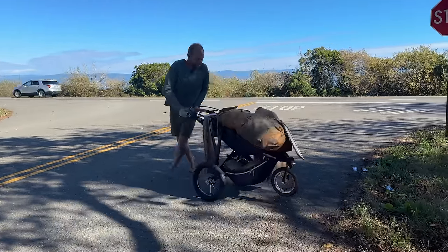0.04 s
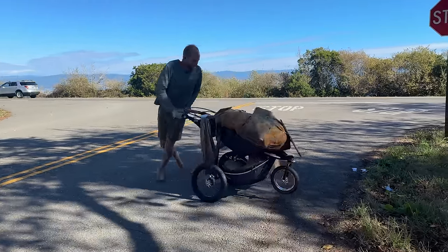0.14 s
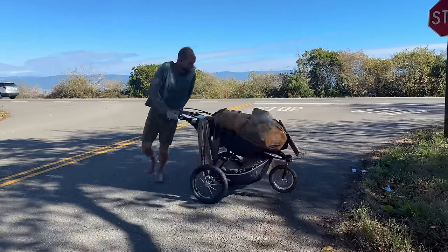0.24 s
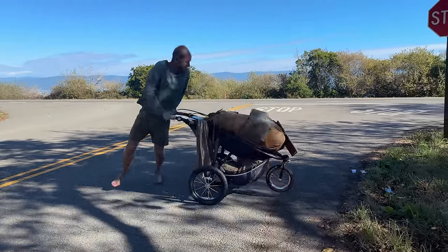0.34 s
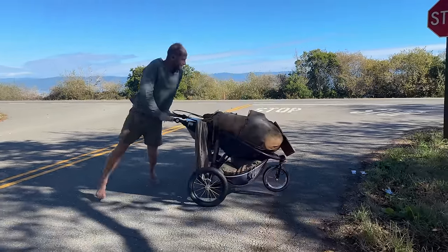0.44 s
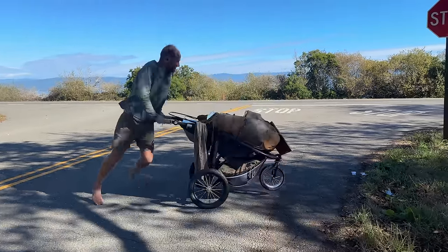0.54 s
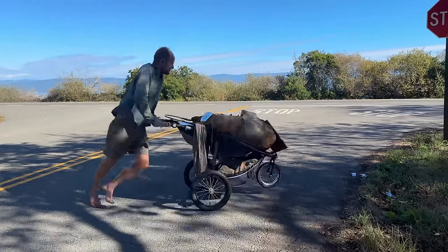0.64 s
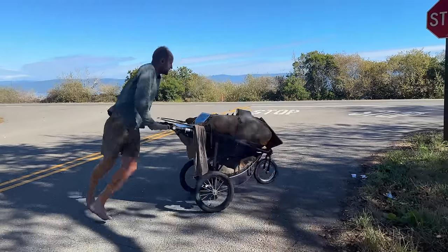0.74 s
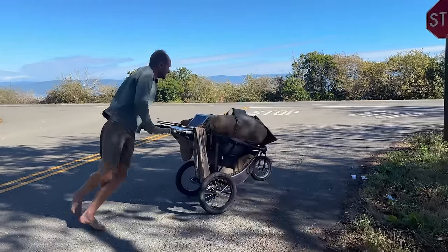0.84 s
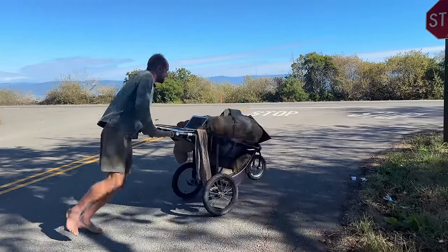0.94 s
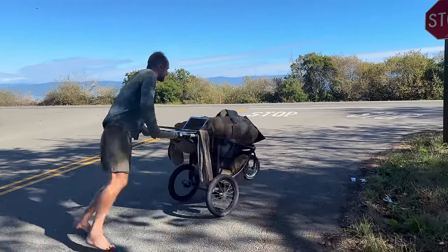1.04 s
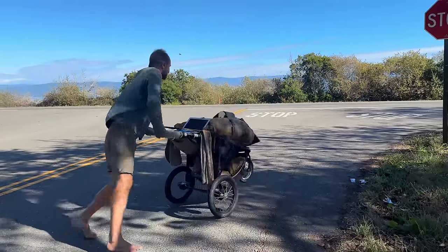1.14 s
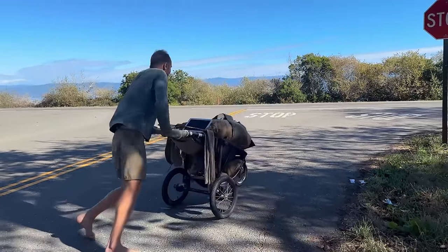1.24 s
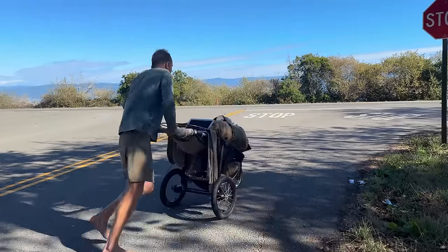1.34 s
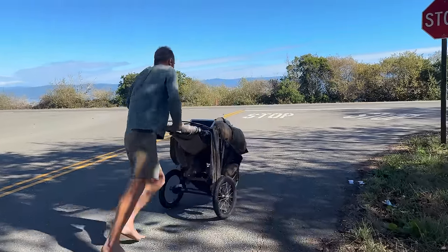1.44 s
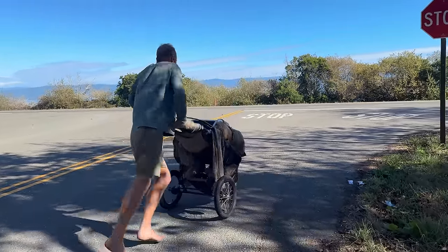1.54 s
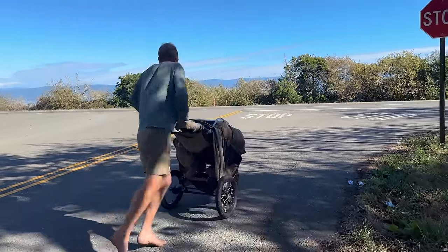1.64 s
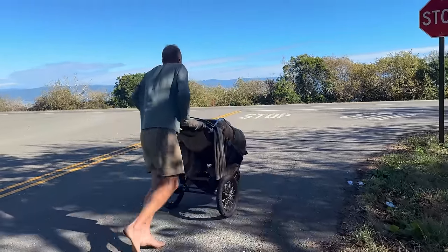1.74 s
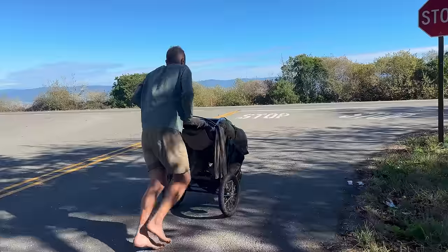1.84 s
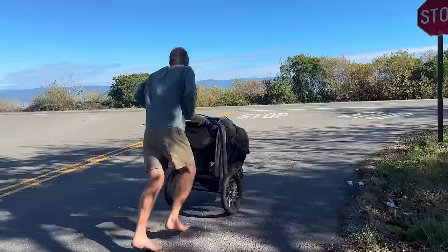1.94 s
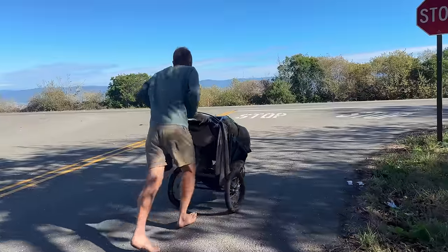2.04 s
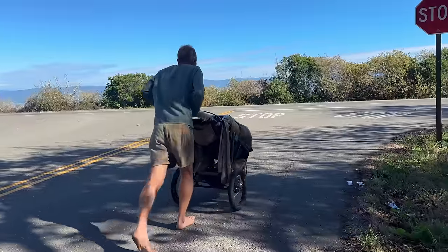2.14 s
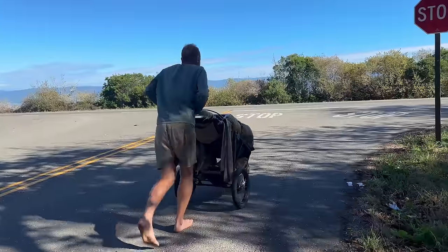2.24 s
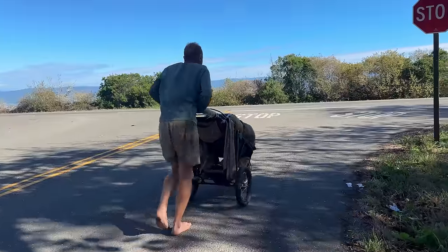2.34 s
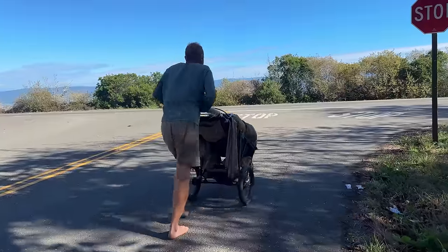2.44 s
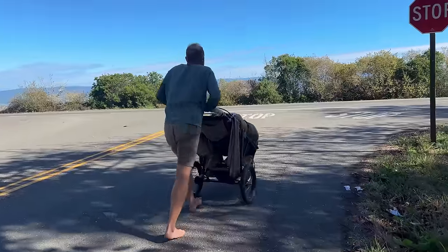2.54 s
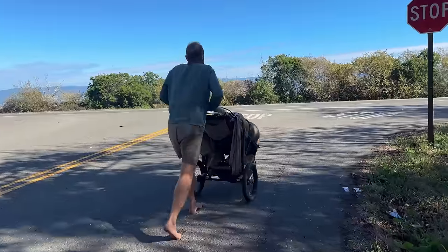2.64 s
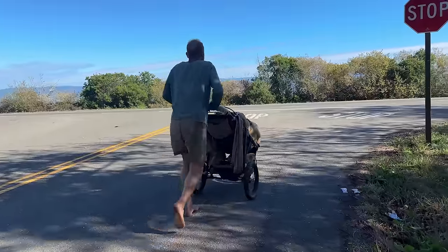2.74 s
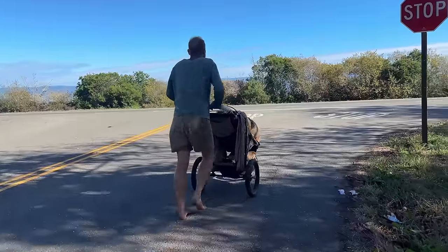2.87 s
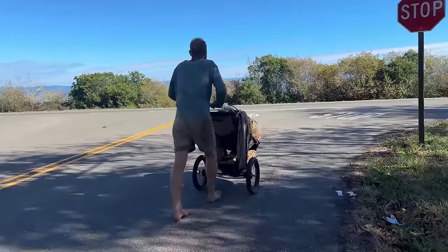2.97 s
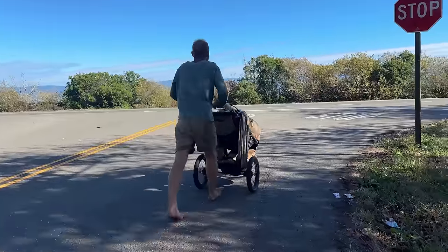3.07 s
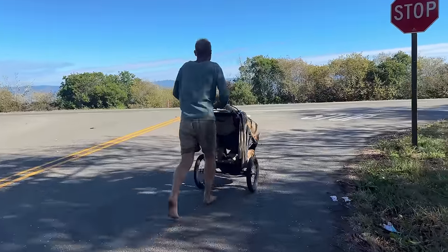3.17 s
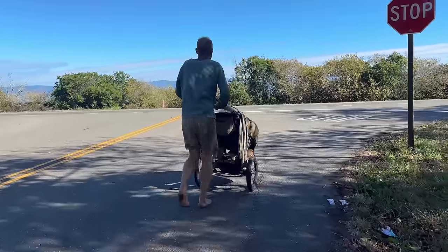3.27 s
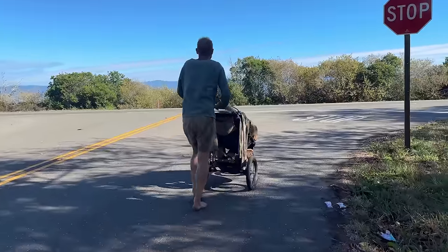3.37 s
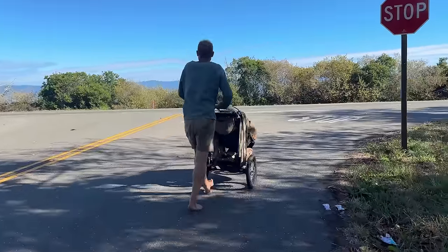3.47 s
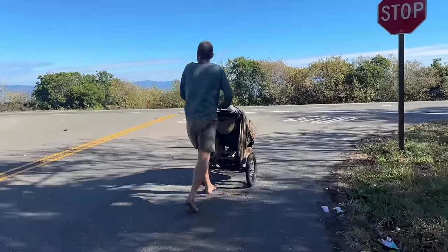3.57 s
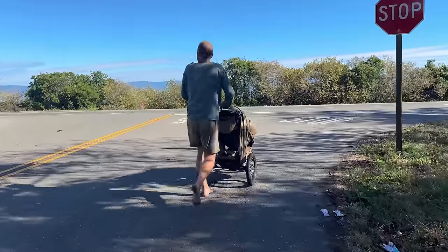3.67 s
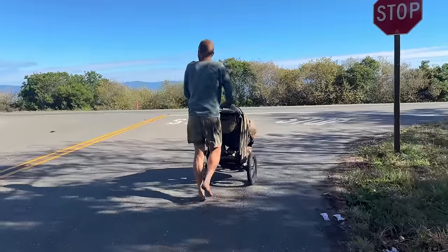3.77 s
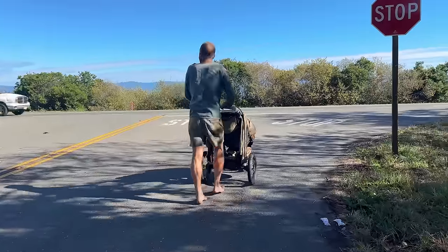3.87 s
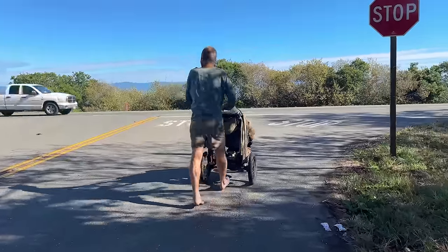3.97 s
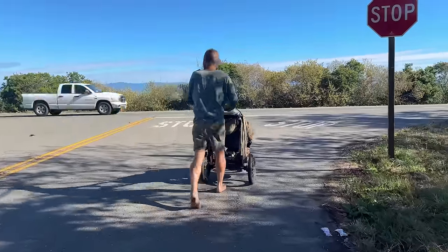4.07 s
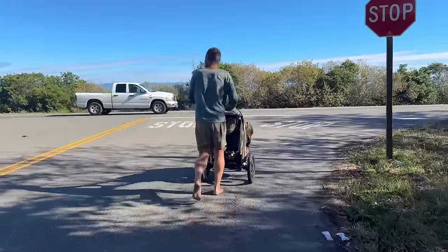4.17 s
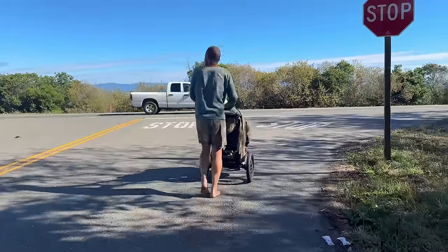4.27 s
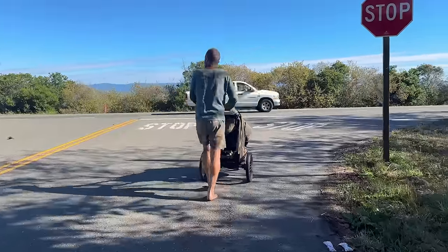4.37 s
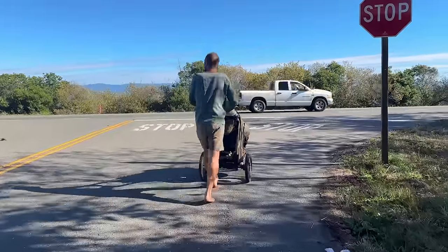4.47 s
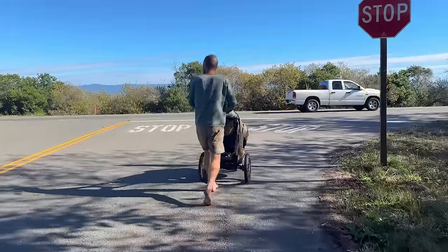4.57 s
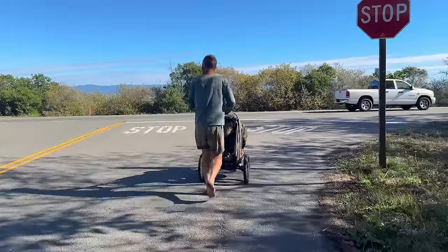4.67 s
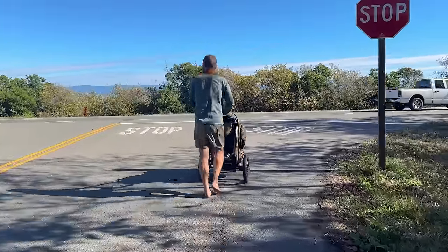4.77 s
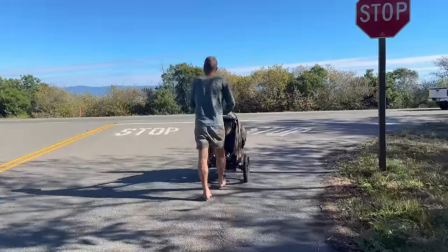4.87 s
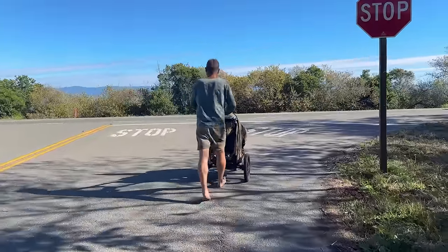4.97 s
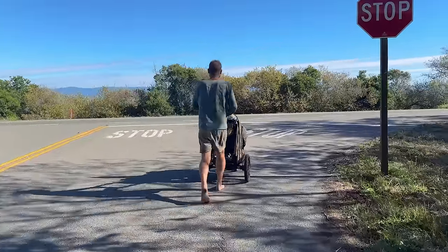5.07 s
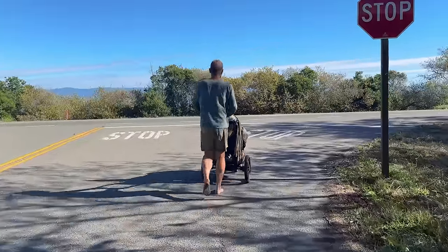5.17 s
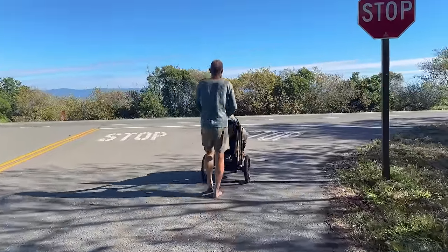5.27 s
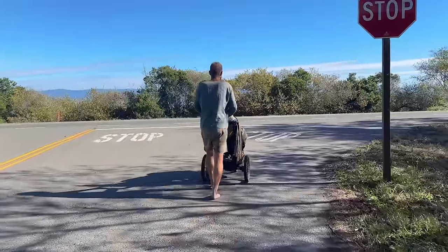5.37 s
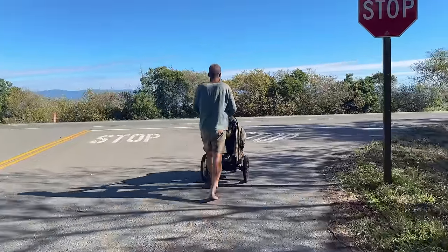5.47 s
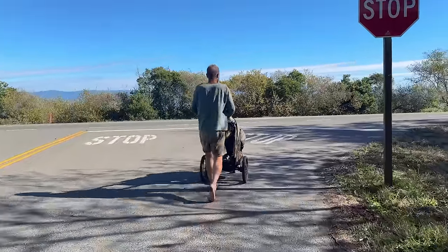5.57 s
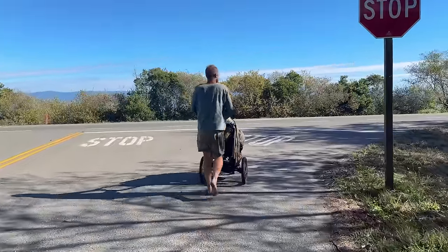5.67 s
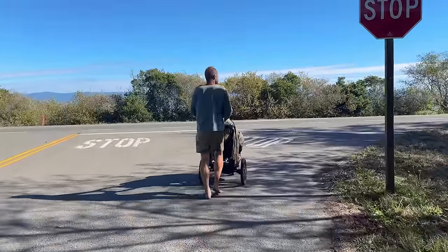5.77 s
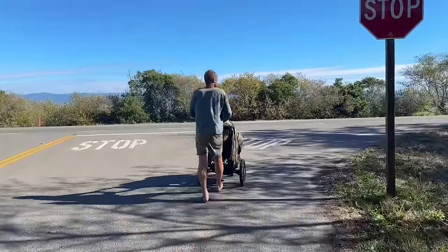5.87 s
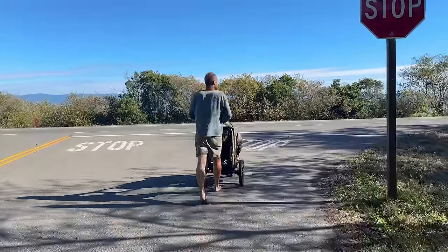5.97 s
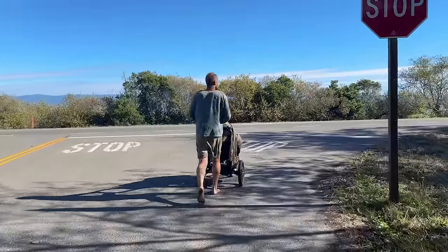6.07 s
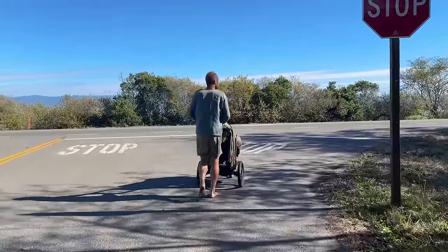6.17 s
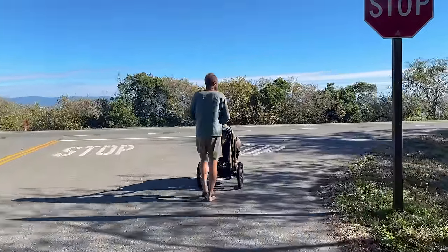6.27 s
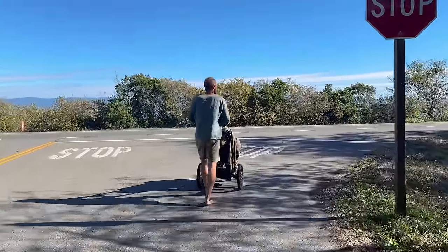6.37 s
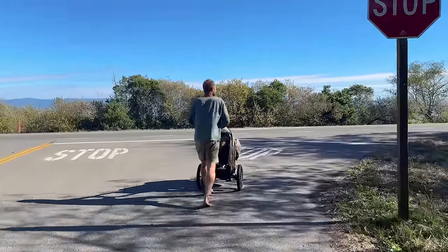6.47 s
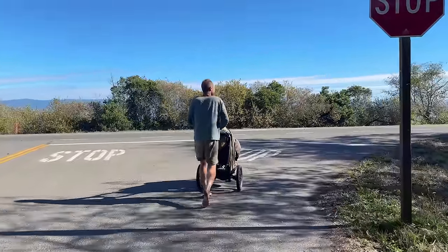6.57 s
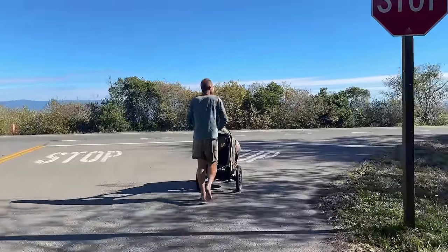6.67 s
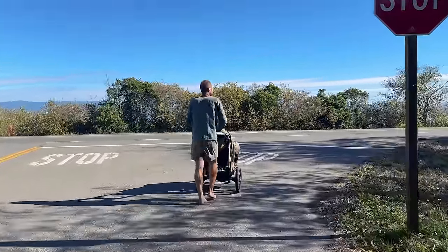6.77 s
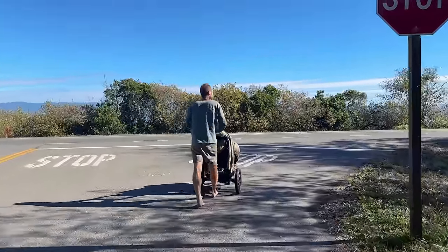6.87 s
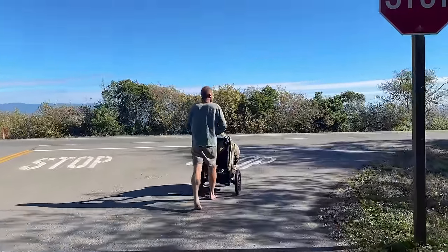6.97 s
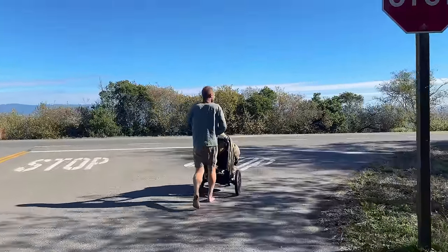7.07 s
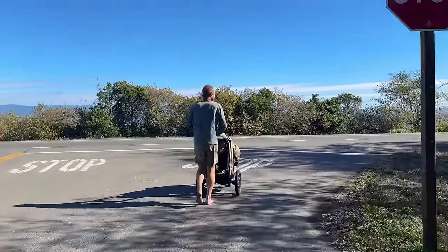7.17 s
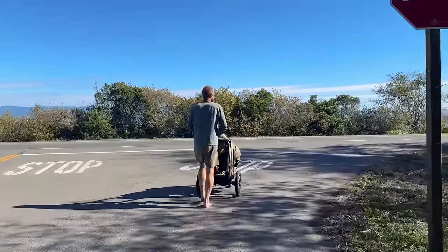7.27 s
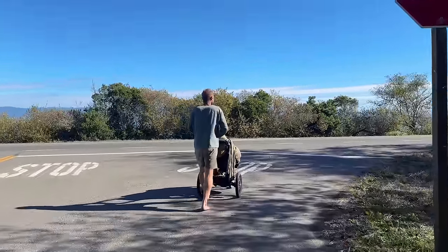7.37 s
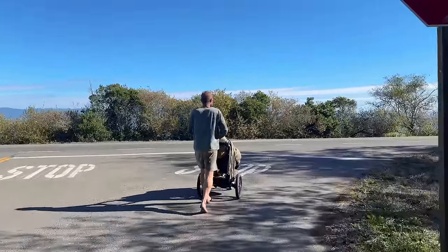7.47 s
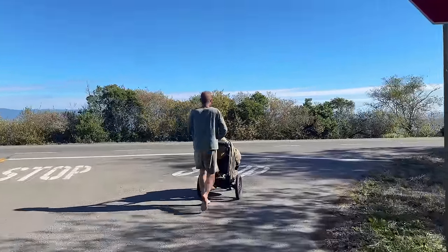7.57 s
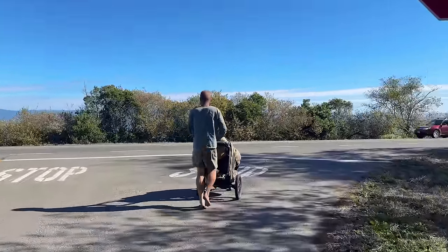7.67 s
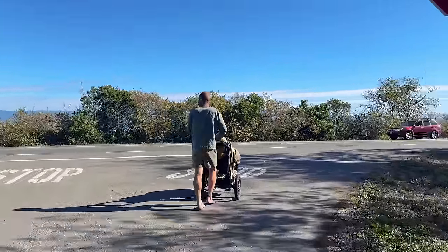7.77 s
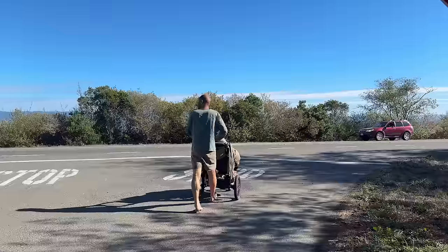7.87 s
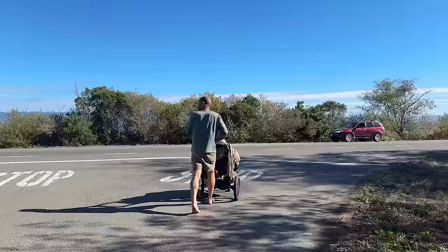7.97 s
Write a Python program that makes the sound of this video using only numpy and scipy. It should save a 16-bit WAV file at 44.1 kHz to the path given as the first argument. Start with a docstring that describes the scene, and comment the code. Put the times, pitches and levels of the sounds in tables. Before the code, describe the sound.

On a quiet side road, a car fades away to the left along a highway while cart wheels crunch grit and scuff the asphalt close to the stereo microphone. A pebble snaps. A pickup then sweeps from left to right with a low exhaust rumble and rushing, hissing tyres. As it recedes, a faint high insect buzz rises and another car approaches from the right. Small puffs of air thud on the microphone.

```python
"""A pickup sweeps left to right along a highway, 17 m from a stereo microphone on a quiet side road.
Its exhaust rumbles, its tread drums, road texture adds a rush and air squeezed from the tyres hisses.
Before it a car recedes to the left; after it another approaches from the right, past roadside bushes.
Close to the microphone a barefoot runner pushes a three-wheeled cart, crushing grit and snapping pebbles.
An insect buzzes in the verge, and puffs of air thud on the microphone."""
import sys
import numpy as np
from scipy import signal
from scipy.fft import rfft, irfft, next_fast_len
from scipy.io import wavfile
from scipy.ndimage import map_coordinates

SR = 44100
rng = np.random.default_rng(int(sys.argv[2]) if len(sys.argv) > 2 else 0)


def persist_wave(psi):
    """Save psi, clipped to +-1, as 16-bit WAV."""
    counts = np.round(np.clip(psi, -1, 1) * 32767).astype(np.int16)
    wavfile.write(sys.argv[1], SR, np.atleast_2d(counts).T)


N = 353682
TIME = np.arange(N) / SR

# Car, pickup, car: closest_s, rightward_m_per_s, distance_m, then relative to the pickup
# boom_db, drone_db, body_db, tread_db, hum_db, rush_db, hiss_db, and last tread_hz, groove_hz
VEHICLES = [(-0.39, -21, 12, -20.5, -18.3, -13.5, -17, -16, -18, -28, 930, 1300),
            (4.28, 30, 17, 0, 0, 0, 0, 0, 0, 0, 795, 1270),
            (8.85, -19, 25, -3, 1.8, -1.5, 2.7, -2, -6, -4, 810, 1230)]
# How each layer carries to the microphone: side_on_db (at REFERENCE_M), loss_db_per_m, beam_ahead_db,
# beam_behind_db, beam_narrowness, bush_shade_share, hedge_loss_db, far_traffic_db
CARRY = {"boom": (-30.3, 0.15, 5.5, 4.5, 2, 0.3, 0, -50), "drone": (-23.7, 0.48, 5, 4, 2, 0.05, 0, -44.3),
         "body": (-25.7, 0.17, -0.3, -1.3, 1.6, 0.45, 2.5, -50),
         "tread": (-25.2, 0.41, 8.6, 7, 1.9, 1.2, 0, -47.5), "hum": (-36, 0.28, 13, 7, 3, 1.2, 0, -55),
         "rush": (-26.8, 0.35, 8.6, 3.5, 1.5, 0.8, 0, -53.5),
         "hiss": (-38.7, 0.45, 10.5, 4.3, 1, 0.02, 11, -73),
         "sizzle": (-45.5, 0.7, 8.5, 4, 1.3, 0.02, 10, -90)}
# Scattered against straight sound, by tyre layer: level_db
SCATTER_DB = {"body": -19, "tread": -15, "rush": -12, "hiss": -7}
# The pickup's firing orders at the closest point: multiple of ENGINE_HZ, level_db
ENGINE_ORDERS = [(2, -32.5), (3, -35), (5, -36)]
# Noise colours of exhausts, tyres and grit: frequency_hz, relative_db
EXHAUST_RUMBLE = [(20, -51), (35, -17), (55, -1), (75, 0.5), (95, -1.5), (130, -17.5), (220, -46)]
EXHAUST_DRONE = [(70, -23), (115, 2.5), (150, 2.5), (200, -1), (290, -3.5), (400, -15.5), (700, -34)]
TYRE_BODY = [(200, -16), (330, -2), (480, 0), (620, -1), (800, -3), (1200, -32)]
TYRE_RUSH = [(600, -22), (900, 2), (1200, -1), (1550, -6.5), (1950, -5.5), (2500, -10.5), (3400, -22),
             (6000, -41)]
TYRE_HISS = [(1300, -11), (2100, 0.5), (2900, 5), (4200, 3.2), (6000, -0.6), (8500, -9), (11000, -13.5),
             (15000, -19)]
TYRE_SIZZLE = [(3500, -24), (6000, -2), (8500, -9), (11000, -8), (15000, -3)]
GRIT_COLOUR = [(900, 16), (2500, 8), (5000, 8.5), (8000, 1), (11000, -1), (15000, 3)]
# Bands of the pickup's whoosh at its height: centre_hz, width_hz, level_db
WHOOSH_BANDS = [(600, 75, -23.5), (385, 65, -30)]
# Bushes along the highway: rightward_m, half_width_m, shade_db
BUSHES = [(-26.3, 2.9, 11.5), (23.4, 2.0, 4), (48.5, 4.2, 8.5)]
# Roadside reflections: delay_ms (source straight ahead), slide_ms per ms of port lead, level_db
REFLECTIONS = [(2.2, 3, -19), (4.1, -4.5, -16.5), (7.3, 8, -14.5)]
# The band cancelled by the road's reflection, lower for a farther vehicle: time_s, centre_hz, depth_db
GROUND_DIP = [(0, 540, 3), (0.7, 510, 2), (2, 500, 2), (3.3, 480, 2), (4.2, 400, 1), (4.7, 450, 4.5),
              (5.15, 330, 4), (5.7, 215, 4.5), (6.3, 190, 4.5), (7, 245, 4.5), (7.4, 365, 4.5), (8, 480, 8)]
# Lag of the microphone's left side: frequency_hz, lag_rad
PORT_LAG = [(120, 0.02), (280, 0.25), (500, 0.62), (800, 0.55), (1250, 0.85), (2000, -0.15), (3500, -0.1),
            (7000, -0.1)]
# Its left side over its right: frequency_hz, far_right_db, half_right_db, half_left_db, far_left_db
PORT_BALANCE = [(120, .2, .2, .3, .3), (350, 1.2, 1, 1, .8), (500, 0, -2.5, .3, 1.2),
                (720, -3.5, -4, -.8, 3.5), (1020, -.5, -6, 0, 3), (1350, -3, -5, -2.3, -1.8),
                (1750, -3.5, -5.3, -5, -3), (2100, -.5, -3.8, -3, -3), (2800, -3.5, -3.3, -2.5, -3.3),
                (4000, -2.5, -2, -3, -3.2), (5000, 0, -2.2, -1, -3), (8000, -1.5, -.5, -4, -4)]
# Those four directions: share of the greatest port lead
PORT_DIRECTIONS = [-.75, -.35, .6, .92]
# The loudest grit crushed under the cart's wheels: start_s, relative_db
CRUNCHES = [(0.1214, -36), (0.143, -40), (0.209, -45), (0.2808, -47), (0.435, -42), (0.4768, -45),
            (0.497, -47), (0.5092, -42), (0.5275, -43), (0.6739, -45), (0.7383, -41), (0.759, -44),
            (0.7642, -43), (0.7776, -44), (0.857, -46), (0.9713, -43), (0.987, -46), (1.0183, -43),
            (1.3009, -43), (1.3279, -45), (1.3788, -36.5), (1.4526, -39), (1.507, -35.5), (1.5832, -35),
            (1.8731, -47), (1.8831, -46), (1.9275, -44), (1.939, -42), (1.9639, -45), (2.1056, -42),
            (2.128, -39), (2.1425, -40), (2.1685, -41), (2.186, -37), (2.2039, -41), (2.2304, -37),
            (2.2463, -34.5), (2.263, -42), (2.2952, -44), (2.3311, -40), (2.3478, -36.5), (2.3888, -42),
            (2.4713, -28), (2.4955, -40), (2.5511, -45), (2.665, -34.5), (2.7367, -45), (2.7656, -38.5),
            (6.163, -48), (6.3182, -47), (6.853, -42), (6.8804, -42), (6.9325, -36)]
# Soles and tyres scuffing the asphalt: centre_s, half_length_s, relative_db
SCUFFS = [(0.49, 0.06, -62), (0.756, 0.054, -64), (1.3, 0.3, -68), (1.747, 0.028, -61.5),
          (1.914, 0.056, -67), (2.277, .14, -61.5), (2.59, 0.083, -56.5)]
# Pebbles snapping free: start_s, snap_db, ring_pitch_hz, ring_db
PEBBLE_SNAPS = [(0.4292, -41, 5400, -43), (2.4725, -41, 2700, -31), (3.0571, -21, 4700, -26),
                (6.7645, -35.5, 5500, -30)]
# A pebble's modes: pitch_hz, relative_db, t60_s
PEBBLE_MODES = [(950, -8, .0025), (1500, 13, 0.0022), (2350, 10.5, 0.0022), (4670, 7, 0.004),
                (5550, 12, 0.0026), (8060, 11, 0.002), (13500, 11, .001)]
# Puffs of air on the microphone: centre_s, level_db
PUFFS = [(2.11, -33.5), (4.0, -22.5), (6.08, -37), (6.26, -35), (6.41, -30.5), (6.548, -34), (6.94, -35),
         (7.14, -31)]

SOUND_M_PER_S, REFERENCE_M = 343, 17
ENGINE_HZ = 44.82  # the pickup's turning rate
PORT_MS = 0.36  # time for sound to cross the microphone's ports; a positive lead is from the left
# The microphone swings to the right with the runner; 0 faces straight across the highway.
MIC_FIRST_RAD, MIC_FINAL_RAD, MIC_SWING_S = -0.05, 0.37, 2.4
HEDGE_END_M, HEDGE_EDGE_M = -32.5, 1.5  # a hedge hides the treble left of here
# Side-on, the horn between tyre and road points away; the surge comes as its rear opens to the microphone.
SIDE_ON_RAD, SIDE_ON_WIDTH_RAD, SIDE_ON_PITCH_SAG = 0.26, 0.19, 0.19
SIDE_ON_TREBLE_LOSS_DB, SIDE_ON_TREAD_LOSS_DB = 3.8, 2.5
SURGE_RAD, SURGE_WIDTH_RAD, SURGE_DB = 0.57, 0.09, 2.8


def passing(closest_s, speed, distance):
    """A vehicle on a straight lane: metres along it, metres from the microphone, bearing, Doppler ratio."""
    along = speed * (TIME - closest_s)
    metres = np.hypot(along, distance)
    doppler = 1 / (1 + speed * along / metres / SOUND_M_PER_S)
    return along, metres, np.arctan2(along, distance), doppler


def highway():
    """Traffic spreads, is absorbed, beams along the lane and dips behind bushes and hedge.
    Returns each layer's level, and port lead and tyre pitches weighted toward the loudest vehicle."""
    power = {layer: from_db(row[-1]) ** 2 for layer, row in CARRY.items()}
    weights, traits = [], []
    facing = np.interp(TIME, [0, MIC_SWING_S], [MIC_FIRST_RAD, MIC_FINAL_RAD])
    for closest_s, speed, distance, *levels_db, tread_hz, groove_hz in VEHICLES:
        boom_db, drone_db, body_db, tread_db, hum_db, rush_db, hiss_db = levels_db
        along, metres, bearing, doppler = passing(closest_s, speed, distance)
        side_on = bell(bearing, SIDE_ON_RAD, SIDE_ON_WIDTH_RAD)
        surge_db = SURGE_DB * bell(bearing * np.sign(speed), SURGE_RAD, SURGE_WIDTH_RAD)
        dull_db = SIDE_ON_TREBLE_LOSS_DB * side_on
        own_db = dict(boom=boom_db, drone=drone_db, body=body_db, hum=hum_db + surge_db,
                      tread=tread_db - SIDE_ON_TREAD_LOSS_DB * side_on + surge_db,
                      rush=rush_db - dull_db, hiss=hiss_db - dull_db, sizzle=hiss_db)
        shade_db = sum(db * bell(along, place, width) for place, width, db in BUSHES)
        hidden = .5 - .5 * np.tanh((along - HEDGE_END_M) / HEDGE_EDGE_M / 2)
        heard = {}
        for layer, (db, db_per_m, ahead_db, behind_db, narrow, shaded, hedge_db, _) in CARRY.items():
            beam_db = np.where(TIME < closest_s, ahead_db, behind_db) * np.abs(along / metres) ** narrow
            lost_db = db_per_m * (metres - REFERENCE_M) + shaded * shade_db + hedge_db * hidden
            heard[layer] = (from_db(db + own_db[layer] + beam_db - lost_db) * REFERENCE_M / metres) ** 2
            power[layer] = power[layer] + heard[layer]
        lead_ms = PORT_MS * np.sin(facing - bearing)
        sag = 1 - SIDE_ON_PITCH_SAG * side_on
        weights.append(heard["tread"])
        traits.append(np.array([lead_ms, tread_hz * doppler * sag, groove_hz * doppler]))
    loudest = sum(weight * trait for weight, trait in zip(weights, traits)) / sum(weights)
    return {layer: 10 * np.log10(p) for layer, p in power.items()}, loudest


def tyres(level_db, lead_ms, tread_hz, groove_hz, rear_late_s=0.09):
    """Tread blocks drum and hum, groove air rings, road texture adds rush and squeezed air hisses."""
    tread = resonance(tread_hz, width_hz=340) * from_db(level_db["tread"] + 0.73 * drift(14))
    hum = resonance(tread_hz * (1 + .025 * drift(9)), width_hz=80) * from_db(level_db["hum"])
    tread = at_ports(tread + hum, lead_ms, SCATTER_DB["tread"])
    # side-on, the carcass's low roar takes over
    body = noise(TYRE_BODY) * from_db(level_db["body"] + drift(14))
    body = at_ports(body, lead_ms, SCATTER_DB["body"])
    groove = resonance(groove_hz, width_hz=560)
    groove += from_db(-9.5) * resonance(groove_hz * (1 + 0.028 * drift(7)), width_hz=58)
    rush = (noise(TYRE_RUSH) + from_db(-3.5) * groove) * from_db(level_db["rush"] + drift(18))
    rush = at_ports(rush, 0.93 * lead_ms, SCATTER_DB["rush"])
    # close up, front and rear axles hiss from different bearings
    hiss = np.zeros((2, N))
    for axle_lead_ms in (lead_ms, np.interp(TIME - rear_late_s, TIME, lead_ms)):
        air = noise(TYRE_HISS) * from_db(level_db["hiss"] + 0.9 * drift(14))
        hiss += at_ports(air, axle_lead_ms, SCATTER_DB["hiss"]) / np.sqrt(2)
    sizzle = noise(TYRE_SIZZLE, channels=2) * from_db(level_db["sizzle"])
    return body + tread + rush + hiss + sizzle


def engines(level_db, lead_ms):
    """Exhausts rumble and drone; the pickup's firing orders glide down as it passes the microphone."""
    sound = noise(EXHAUST_RUMBLE) * from_db(level_db["boom"] + 0.46 * drift(22))
    sound += noise(EXHAUST_DRONE) * from_db(level_db["drone"] + 0.44 * drift(15))
    _, metres, _, _ = passing(*VEHICLES[1][:3])
    sent_s = TIME - metres / SOUND_M_PER_S
    falloff = (REFERENCE_M / metres) ** 2.3  # steep: bushes screen the engine farther off
    for multiple, db in ENGINE_ORDERS:
        cycles = multiple * ENGINE_HZ * sent_s + 0.11 * drift(17)
        sound[0] += np.sqrt(2) * np.sin(2 * np.pi * cycles) * from_db(db + 3.4 * drift(15)) * falloff
    return at_ports(sound, 0.96 * lead_ms, scatter_db=-17)


def whoosh(lead_ms, peak_s=4.42, half_length_s=0.09, fall_oct_per_s=3):
    """Two bands of the roar dive in pitch as the pickup's flank goes by."""
    fall = 2 ** (-fall_oct_per_s * np.clip(TIME - peak_s, -.5, .5))
    bands = sum(from_db(db) * resonance(hz * fall, width_hz) for hz, width_hz, db in WHOOSH_BANDS)
    return at_ports(bands * bell(TIME, peak_s, half_length_s), lead_ms, SCATTER_DB["body"])


def roadside(sound, lead_ms):
    """Reflections slide against the direct sound, sweeping a faint ripple through a moving roar."""
    out = sound.copy()
    for delay_ms, slide, db in REFLECTIONS:
        sent_s = TIME - (delay_ms + slide * lead_ms) / 1000
        out += from_db(db) * np.array([np.interp(sent_s, TIME, side) for side in sound])
    return out


def ground_and_ports(sound, lead_ms, hollow_hz=2400, hollow_db=4):
    """The road's reflection cuts a sliding dip; the microphone colours the traffic by direction."""
    hz, frame_s, frames = signal.stft(sound, SR, nperseg=1024)
    octave = np.log2(np.maximum(hz, 1))[:, None]
    dip_s, dip_hz, dip_db = np.transpose(GROUND_DIP)
    dip_octave = np.log2(np.interp(frame_s, dip_s, dip_hz))
    colour_db = -np.interp(frame_s, dip_s, dip_db) * bell(octave, dip_octave, .3)
    direction = np.interp(frame_s, TIME, lead_ms) / PORT_MS
    shares = [np.interp(direction, PORT_DIRECTIONS, one) for one in np.eye(len(PORT_DIRECTIONS))]
    # sound from the right has a hollow in the treble
    colour_db -= hollow_db * (shares[0] + shares[1]) * bell(octave, np.log2(hollow_hz), .11)
    balance_hz, *columns = np.transpose(PORT_BALANCE)
    balance_db = sum(share * np.interp(octave, np.log2(balance_hz), column)
                     for share, column in zip(shares, columns))
    lag_hz, lag_rad = np.transpose(PORT_LAG)
    left = from_db(balance_db / 2) * np.exp(-.5j * np.interp(octave, np.log2(lag_hz), lag_rad))
    return signal.istft(frames * from_db(colour_db) * np.array([left, 1 / left]), SR)[1][:, :N]


def cart_grit(faint_per_s=6, turn_ends_s=2.7, crack_rise_s=.0017):
    """Close by, grit cracks under the wheels in milliseconds; scuffs drag smaller grains along."""
    cracks = np.zeros(N)
    # fainter bits crack at random while the cart swings onto its course
    faint = [((k + when) / faint_per_s, -53 + 2.5 * (2 * size - 1))
             for k, (when, size) in enumerate(rng.random((60, 2)))]
    crunches = CRUNCHES + [(s, db) for s, db in faint if s < turn_ends_s]
    rises_s = crack_rise_s * 2 ** rng.uniform(-.6, .6, 200)
    for (start_s, db), rise_s in zip(crunches, rises_s):
        start = int(start_s * SR)
        age = np.maximum(TIME[start:][:2000] - start_s, 0) / rise_s
        cracks[start:][:2000] += from_db(db - 3.8) * age * np.exp(1 - age)
    drag = sum(from_db(db) * bell(TIME, s, half_length_s) for s, half_length_s, db in SCUFFS)
    grains = (rng.random(N) < 45 / SR) * from_db(4.6 * np.minimum(rng.exponential(1, N), 3))
    grains = signal.lfilter([1], [1, -np.exp(-1 / (0.0019 * SR))], grains + 1e-18)  # 1.9 ms decay
    grit = noise(GRIT_COLOUR, channels=2) * (cracks + drag * (0.91 + 1.8 * grains))
    # each crack also rings briefly at a pitch of its own
    knock = resonance(2650 * 2 ** (.22 * drift(30)), width_hz=1900, channels=2) * cracks
    return (grit + from_db(-3.5) * knock) * from_db([[-1.2], [1.2]])


def cart_tyres(up_to_speed_s=0.7, fade_db_per_s=0.7):
    """Knobbly tyres rasp on coarse asphalt, growing with speed and fading as the cart draws away."""
    rasp = resonance(2400, width_hz=750) * from_db(1.8 * drift(40))
    level = np.minimum(TIME / up_to_speed_s, 1) * from_db(-58.5 - fade_db_per_s * TIME)
    return at_ports(rasp * level, lead_ms=0.46, scatter_db=0.5)


def pebbles():
    """A pinched pebble shoots free with a short, bright snap and rings on, centred between the sides."""
    out = np.zeros(N)
    click = signal.unit_impulse(2000)
    for start_s, snap_db, ring_hz, ring_db in PEBBLE_SNAPS:
        snap = sum((-1) ** k * from_db(snap_db + db) * ring(click, hz, t60_s)
                   for k, (hz, db, t60_s) in enumerate(PEBBLE_MODES))
        after_ring = from_db(ring_db) * ring(click, ring_hz, t60_s=.011)
        out[round(start_s * SR):][:len(click)] += snap + after_ring
    return np.array([out, out])


def insect(full_s=7.35, rise_db_per_s=18, fall_db_per_s=8):
    """In the verge a high, slightly unsteady buzz swells and slowly eases off."""
    level_db = -53.2 + np.minimum(rise_db_per_s * (TIME - full_s), fall_db_per_s * (full_s - TIME))
    buzz = resonance(11200, width_hz=1200, channels=2) * from_db(1.2 * drift(35))
    return buzz * from_db(level_db)


def breeze(shake_hz=72):
    """Each puff of air shakes the microphone for a few slow cycles."""
    shake = sum(from_db(db) * bell(TIME, centre_s, 0.019) for centre_s, db in PUFFS)
    return shake * np.sqrt(2) * np.sin(2 * np.pi * (shake_hz * TIME + 0.15 * drift(25)))


def far_wash(peak_s=6.2, half_length_s=.8):
    """Tyres far down the highway to the right leave a soft wash that swells between the passes."""
    swell = from_db(-53.5) * bell(TIME, peak_s, half_length_s)
    return at_ports(resonance(1420, width_hz=720) * swell, lead_ms=-.25, scatter_db=-10)


def at_ports(sound, lead_ms, scatter_db):
    """Row 0 comes straight and reaches one port first; the other two are scattered by road and bushes."""
    direct = [map_coordinates(sound[0], [(TIME + side * lead_ms / 2000) * SR], order=3, mode="nearest")
              for side in (1, -1)]
    scatter = from_db(scatter_db)
    return (np.array(direct) + scatter * sound[1:]) / np.sqrt(1 + scatter ** 2)


def noise(spectrum, channels=3):
    """Unrelated noises of one colour, rms 1."""
    size = next_fast_len(N)
    hz, db = np.transpose(spectrum)
    bins_hz = np.maximum(np.arange(size // 2 + 1) * SR / size, 1)
    top_db = db[-1] if hz[-1] > 12000 else -90
    gain = from_db(np.interp(np.log(bins_hz), np.log(hz), db, left=-80, right=top_db))
    return rms_one(irfft(rfft(rng.standard_normal((channels, size))) * gain, size)[:, :N])


def resonance(centre_hz, width_hz, channels=3):
    """Unrelated noises in one band whose centre may move, rms 1."""
    a, b = butter(rng.standard_normal((2, channels, N)), width_hz / 2, "low")
    phase = 2 * np.pi * np.cumsum(centre_hz * np.ones(N)) / SR
    return rms_one(a * np.cos(phase) + b * np.sin(phase))


def ring(clicks, hz, t60_s):
    """A unit click sets a sine of height 1 ringing."""
    decay, step = from_db(-60 / (t60_s * SR)), 2 * np.pi * hz / SR
    return signal.lfilter([0, np.sin(step)], [1, -2 * decay * np.cos(step), decay ** 2], clicks + 1e-18)


def drift(rate_hz):
    """A slow random wander, rms 1."""
    knots = rng.standard_normal(2000)
    return rms_one(np.interp(TIME * rate_hz, np.arange(len(knots)), knots))


def bell(x, centre, half_width):
    """A Gaussian bump of height 1."""
    return np.exp(-.5 * ((x - centre) / half_width) ** 2)


def butter(x, hz, kind, order=2):
    """Causal Butterworth filter."""
    return signal.sosfilt(signal.butter(order, hz, kind, fs=SR, output="sos"), x)


def from_db(db):
    """Decibels to gain."""
    return 10 ** (np.asarray(db) / 20)


def rms_one(x):
    """Scale to unit power."""
    return x / np.sqrt(np.mean(x ** 2) + 1e-20)


def scene():
    """Traffic across the junction, small sounds close to the microphone."""
    level_db, (lead_ms, tread_hz, groove_hz) = highway()
    traffic = engines(level_db, lead_ms)
    traffic += roadside(tyres(level_db, lead_ms, tread_hz, groove_hz), lead_ms)
    traffic = ground_and_ports(traffic + whoosh(lead_ms) + far_wash(), lead_ms)
    return traffic + cart_grit() + cart_tyres() + pebbles() + insect() + breeze()


def record(dry, split_hz=8900, cutoff_hz=15000, late_samples=14):
    """The right port feeds the top treble to both sides, the left late and inverted; then a steep cut."""
    treble = butter(dry[1], split_hz, "high", order=12)
    below = butter(dry, split_hz, "low", order=12)
    left_treble = -np.r_[np.zeros(late_samples), treble[:-late_samples]]
    top_cut = signal.ellip(10, .2, 80, cutoff_hz, fs=SR, output="sos")
    return signal.sosfilt(top_cut, below + from_db(-1.2) * np.array([left_treble, treble]))


dry = scene()
out = record(dry)
persist_wave(out)
```